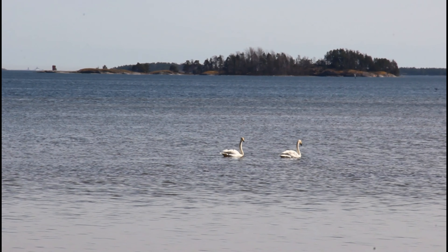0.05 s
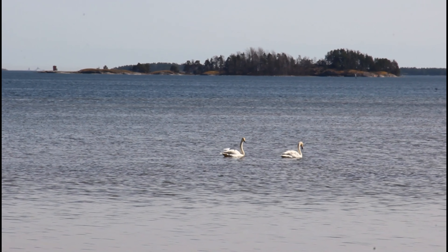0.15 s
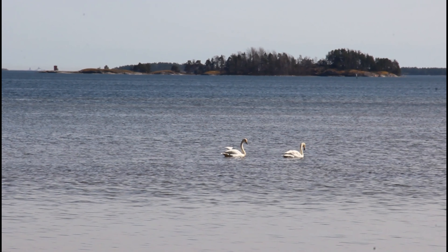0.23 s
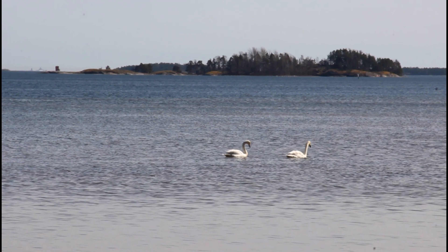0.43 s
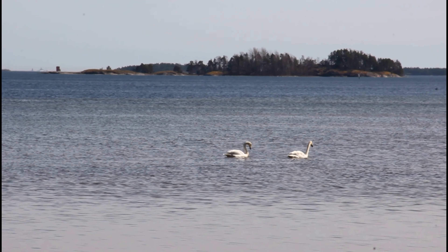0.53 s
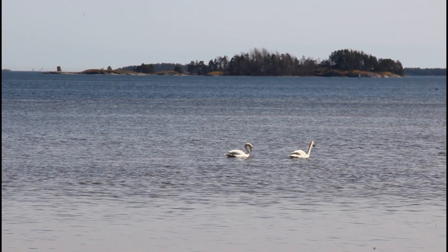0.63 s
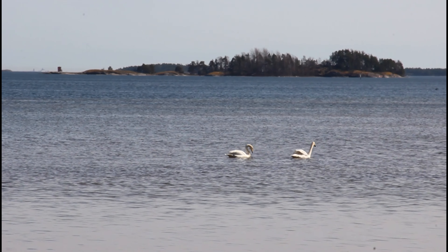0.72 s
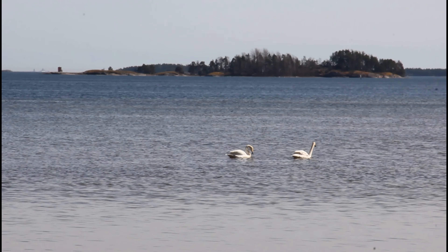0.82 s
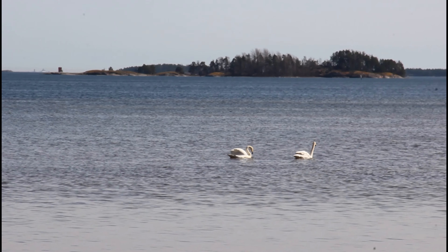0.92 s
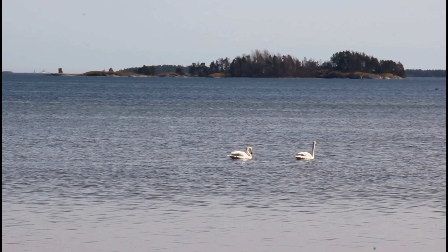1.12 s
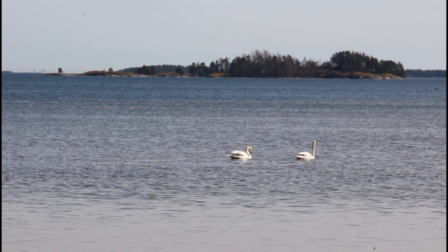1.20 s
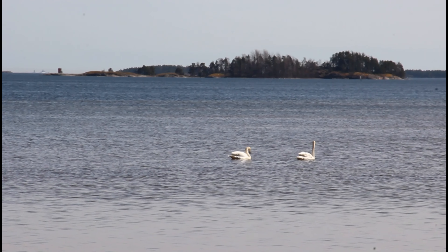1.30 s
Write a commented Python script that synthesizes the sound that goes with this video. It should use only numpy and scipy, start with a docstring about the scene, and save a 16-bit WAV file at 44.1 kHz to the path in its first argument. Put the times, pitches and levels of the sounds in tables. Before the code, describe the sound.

Two swans call at a distance across open water: one honks three times in quick succession, while the other joins with a raspy, breaking call at the end. Soft wind, water and faint microphone hiss continue underneath.

```python
"""Swans on open water

Three clean, bugling honks sound some way off, their overtones shaped by the throat. A higher,
hoarse voice touches the first and cuts into the last; a small bird chirps once. The calls
scatter back faintly from the waves and the shore, over a soft wash of wind and water,
a faint low hum and the microphone's hiss."""
import sys
import numpy as np
from scipy import signal
from scipy.fft import rfft, irfft, next_fast_len
from scipy.io import wavfile
from scipy.ndimage import map_coordinates

SR = 44100
rng = np.random.default_rng(int(sys.argv[2]) if len(sys.argv) > 2 else 0)


def master(y):
    """Save y as 16-bit WAV."""
    cut = np.clip(np.atleast_2d(y).T, -1, 1)
    pcm = np.round(cut * 32767)  # scale
    wavfile.write(sys.argv[1], SR, pcm.astype(np.int16))


N = 59535
T = np.arange(N) / SR
FLUTTER_PER_S = 250  # rate of pitch jitter and level shimmer


def amp(db):
    """Decibels to gain."""
    return 10 ** (np.asarray(db) / 20)


def gain_at(colour, hz):
    """Gain at hz from (Hz, dB) points on a log frequency axis."""
    points_hz, points_db = np.transpose(colour)
    return amp(np.interp(np.log(hz + 1), np.log(points_hz + 1), points_db))


def curves(rows):
    """One value per sample for each column after the time."""
    times_s, *columns = np.transpose(rows)
    return [np.interp(T, times_s, column) for column in columns]


def gate(rows, fade_s=0.0057):
    """Open from the first row's time to the last's."""
    inside_s = np.minimum(T - rows[0][0], rows[-1][0] - T)
    return np.clip(inside_s / fade_s + 0.5, 0, 1)


def wobble(knots_per_s):
    """A smooth random curve."""
    return map_coordinates(rng.standard_normal(N), [T * knots_per_s], mode="wrap")


def filtered(x, response):
    """Filter x by a gain given as a function of Hz."""
    size = next_fast_len(N + SR // 2)
    hz = np.fft.rfftfreq(size, 1 / SR)
    return irfft(rfft(x, size) * response(hz), size)[:N]


def noise(colour):
    """Noise of rms 1, coloured by (Hz, dB) points."""
    x = filtered(rng.standard_normal(N), lambda hz: gain_at(colour, hz))
    return x / x.std()


def jittered_phase(hz, jitter, knots_per_s=FLUTTER_PER_S):
    """Running phase of a vibration whose pitch wavers by the fraction jitter."""
    return 2 * np.pi * np.cumsum(hz * (1 + jitter * wobble(knots_per_s))) / SR


def harmonic(k, phase, pitch_hz, throat):
    """The k-th harmonic of a voice, weighted by the throat."""
    return np.sqrt(2) * gain_at(throat, k * pitch_hz) * np.sin(k * phase)


# Spectrum of wind and water. Each row: frequency in Hz, level in dB.
WASH_COLOUR = [(35, -41), (60, -8), (135, -8), (219, -5), (448, -4.5), (605, 0.5), (816, -1.5), (1130, -9),
               (1560, -9), (2590, -15), (3750, -15), (15000, -26)]


def background(wash_db=-55, swell_db=0.43, hum_hz=42.6, hum_db=-69, hiss_db=-66.5):
    """A steady wash of wind and wavelets, a faint low hum and microphone hiss."""
    wash = noise(WASH_COLOUR) * amp(wash_db + swell_db * wobble(8.0))
    hum = np.sqrt(2) * np.sin(jittered_phase(hum_hz, jitter=0.026, knots_per_s=8.1))
    hiss = noise([(6000, -27), (11000, -2), (15000, 2.5)])
    return wash + amp(hum_db) * hum + amp(hiss_db) * hiss


# Spectrum of the reflections. Each row: frequency in Hz, level in dB.
REFLECTION_COLOUR = [(700, -10.5), (1300, -14), (2500, -11), (6000, -5.5)]


def reflections(calls, waves_db=-20, rise_s=0.013, waves_t60_s=0.41,
                echo_db=-27.5, echo_s=0.11, echo_t60_s=0.028):
    """The waves return a faint, diffuse tail; the rocky shore returns one smeared echo."""
    waves = amp(-60 * T / waves_t60_s) * (1 - np.exp(-T / rise_s))
    rocks = (T > echo_s) * amp(-60 * np.abs(T - echo_s) / echo_t60_s)
    hz = np.fft.rfftfreq(N, 1 / SR)
    voice_band = (hz > 500) & (hz < 1000)
    impulse_response = np.zeros(N)
    for envelope, level_db in ((waves, waves_db), (rocks, echo_db)):
        tail = noise(REFLECTION_COLOUR) * envelope
        band_gain = np.sqrt(np.mean(np.abs(rfft(tail)[voice_band]) ** 2))
        impulse_response += amp(level_db) * tail / band_gain
    return signal.fftconvolve(calls, impulse_response)[:N]


# The chirp. Each row: time in seconds, pitch in Hz, level in dB.
BIRD_CHIRP = [(.135, 2796, -76), (.152, 2970, -61), (.172, 3280, -78)]


def small_bird():
    """One faint, rising chirp from a distant bird."""
    pitch_hz, level_db = curves(BIRD_CHIRP)
    phase = jittered_phase(pitch_hz, jitter=0.02)
    return gate(BIRD_CHIRP) * amp(level_db) * np.sqrt(2) * np.sin(phase)


# Two hoarse calls, faint then loud. Each row: time in seconds, pitch in Hz, level in dB, roughness.
HOARSE_CALLS = [
    [(.203, 758, -50, 0.77), (.222, 746, -44.5, 0.2), (.255, 742, -51, 0), (.285, 740, -67, .1)],
    [(.603, 745, -45, 0.6), (.612, 738, -42.5, 0.3), (.619, 726, -25, 0.62), (.632, 729.3, -25, 1.12),
     (.647, 721, -33.5, 1.23), (.655, 667.7, -37.5, 0.75), (.662, 622, -36.5, 1), (.69, 612.2, -33.5, .1),
     (.708, 603, -37, .2), (.728, 598, -55.5, 0)],
]
# The rough burst where the voice breaks. Each row: time in seconds, level in dB.
BREAK_ENVELOPE = [(.651, -66), (.664, -37), (.676, -58)]
# Spectra of the throat, the rasp and the break. Each row: frequency in Hz, level in dB.
HOARSE_THROAT_COLOUR = [(720, 0), (1220, -12), (1440, -29), (1840, -14), (2000, -26), (2200, -34),
                        (2800, -25), (3000, -36), (3600, -33), (4400, -49)]
RASP_NOISE_COLOUR = [(400, -19), (850, -7), (1700, -9), (2200, -9), (2780, 2.5), (3300, -15), (5000, -25),
                     (9000, -40)]
BREAK_NOISE_COLOUR = [(450, -35), (700, -15), (980, 0), (1200, 3.5), (1600, -31), (2800, -22), (4500, -54)]


def hoarse_voice(jitter=0.0096, shimmer_db=1.97, side_offset_hz=108, side_db=-14.5, rasp_db=-23.5):
    """A higher, raspy voice beats against the honks, then breaks and settles lower and cleaner."""
    break_db, = curves(BREAK_ENVELOPE)
    voice = gate(BREAK_ENVELOPE) * noise(BREAK_NOISE_COLOUR) * amp(break_db)
    for call in HOARSE_CALLS:
        pitch_hz, level_db, roughness = curves(call)
        phase = jittered_phase(pitch_hz, jitter * roughness)
        tone = sum(harmonic(k, phase, pitch_hz, HOARSE_THROAT_COLOUR) for k in range(1, 4))
        edge = sum(harmonic(k, phase, pitch_hz, HOARSE_THROAT_COLOUR) for k in range(4, 8))
        side_phase = phase + 2 * np.pi * (side_offset_hz * T + rng.random())
        side_tone = amp(side_db) * np.sqrt(2) * np.sin(side_phase)
        rasp = amp(rasp_db) * noise(RASP_NOISE_COLOUR)
        envelope = gate(call) * amp(level_db + shimmer_db * roughness * wobble(FLUTTER_PER_S))
        voice += envelope * (tone + roughness * (edge + side_tone + rasp))
    return voice


# The clean honks. Each row: time in seconds, pitch in Hz, then levels in dB of the
# fundamental, the octave and the upper overtones.
HONK_1 = [(0.203, 613, -64, -58, -85), (0.211, 626.8, -46.5, -66, -75), (0.22, 633.5, -34.5, -35, -53),
          (0.241, 631.7, -32, -31.5, -47.5), (0.291, 621.4, -34, -33.5, -49),
          (0.329, 620, -33.5, -39.5, -55.5), (0.365, 610.5, -39.5, -42.5, -58.5),
          (.381, 609.1, -44.5, -60, -80), (0.403, 610.8, -45, -71, -83)]
HONK_2 = [(0.401, 613.7, -45, -61, -72), (0.419, 620.6, -42.5, -49, -68), (0.436, 631.1, -36.5, -41.5, -48),
          (0.466, 642.2, -33.5, -36.5, -41.5), (0.485, 642.5, -31, -39, -38.5), (0.51, 623, -35, -37, -47),
          (0.525, 600.3, -43.5, -49, -61), (0.539, 599.1, -48, -63, -78), (.552, 592, -62, -67, -83)]
HONK_3 = [(0.602, 573, -70, -59, -79), (0.613, 610, -54, -41.5, -65.5), (0.634, 651.8, -45, -33, -52),
          (0.657, 662.8, -38, -34, -50), (0.677, 638.2, -45, -30.5, -50), (0.688, 627.4, -59, -56, -57),
          (0.709, 589, -53, -47.5, -74), (0.726, 567, -58, -49.5, -82), (0.737, 558, -70, -75, -90)]
# Throat response, one list per honk. Each row: frequency in Hz, gain in dB.
HONK_THROATS = [
    [(1880, 2), (2500, -21), (3130, -15.5), (3750, -26), (4400, -24), (5050, -25.5), (5700, -56)],
    [(1900, 2), (2550, -8), (3200, -24), (3850, -27.5), (4480, -25), (5100, -43), (7000, -52)],
    [(1900, 4), (2400, -13), (2650, -12), (3250, -18.5), (3850, -20), (4500, -26), (7000, -44)],
]
# Path of a narrow throat resonance. Each row: time in seconds, centre in Hz.
FORMANT_PATH = [(.25, 3010), (.265, 4400), (.287, 4240), (.33, 3260), (.452, 3280), (.467, 4320),
                (.484, 3870), (.497, 3780), (.51, 3070), (.635, 2720), (.664, 2640), (.673, 3750)]
# Faint, husky trace of the higher voice beneath the honks. Each row: frequency in Hz, level in dB.
HUSKY_UNDERTONE_COLOUR = [(400, -32), (620, -7), (760, 9), (880, -2), (1050, -22), (1500, -13), (2600, -17),
                          (5000, -43)]


def clean_swan(jitter=0.002, shimmer_db=-0.17, undertone_db=-24.5, formant_db=11, half_width_hz=158):
    """Three honks on one running voice; a moving throat resonance picks out overtones in turn."""
    pitch_hz = curves(sorted(HONK_1 + HONK_2 + HONK_3))[0]
    phase = jittered_phase(pitch_hz, jitter)
    centre_hz, = curves(FORMANT_PATH)
    undertone = amp(undertone_db) * noise(HUSKY_UNDERTONE_COLOUR)
    voice = np.zeros(N)
    for honk, throat in zip((HONK_1, HONK_2, HONK_3), HONK_THROATS):
        _, fundamental_db, octave_db, upper_db = curves(honk)
        body = np.sqrt(2) * (amp(fundamental_db) * np.cos(phase) - amp(octave_db) * np.cos(2 * phase))
        upper = np.zeros(N)
        for k in range(3, 11):
            detuning = (k * pitch_hz - centre_hz) / half_width_hz
            upper += amp(formant_db / (1 + detuning ** 2)) * harmonic(k, phase, pitch_hz, throat)
        voice += gate(honk) * (body + amp(upper_db) * upper + amp(fundamental_db) * undertone)
    return voice * amp(shimmer_db * wobble(FLUTTER_PER_S))


def scene():
    """The calls and their reflections over the background, in mono."""
    calls = clean_swan() + hoarse_voice() + small_bird()
    return (calls + reflections(calls) + background())[None]


def record(dry):
    """A sharp band limit cuts the highest treble."""
    top_hz = 15800
    return np.array([filtered(channel, lambda hz: hz < top_hz) for channel in dry])


dry = scene()
out = record(dry)
master(out)
```